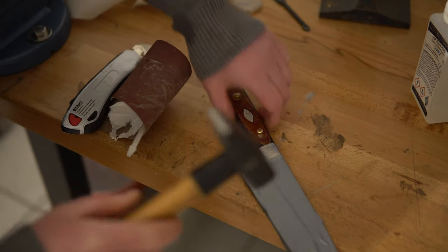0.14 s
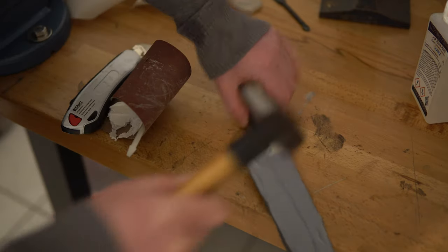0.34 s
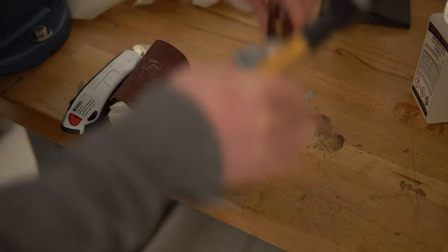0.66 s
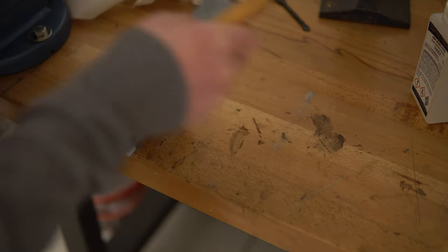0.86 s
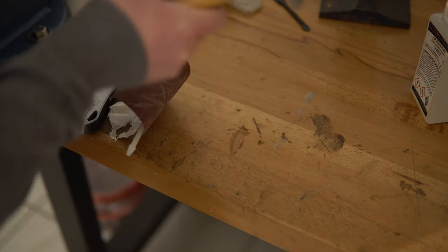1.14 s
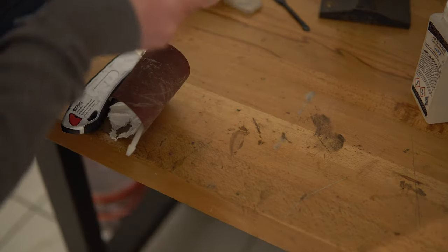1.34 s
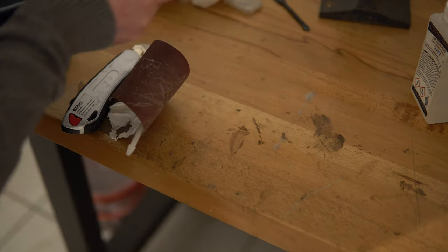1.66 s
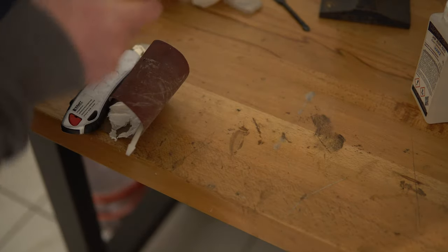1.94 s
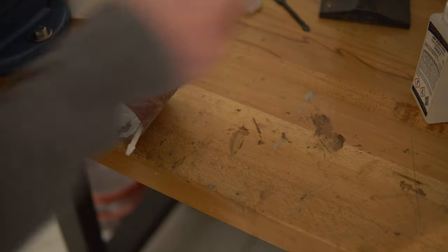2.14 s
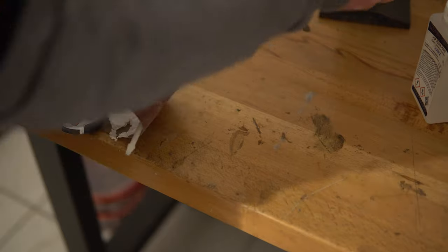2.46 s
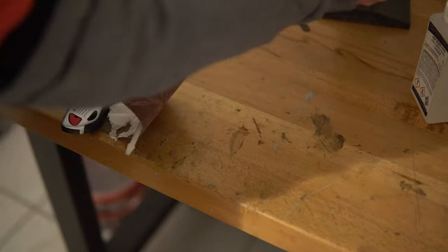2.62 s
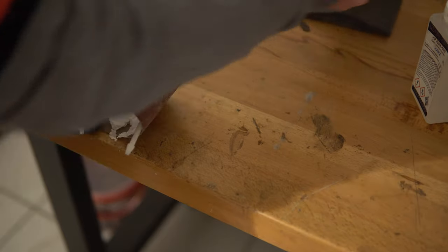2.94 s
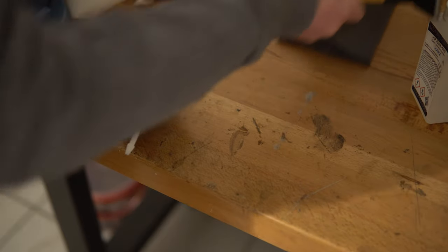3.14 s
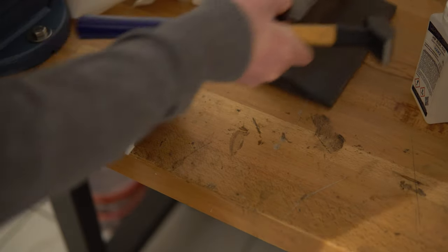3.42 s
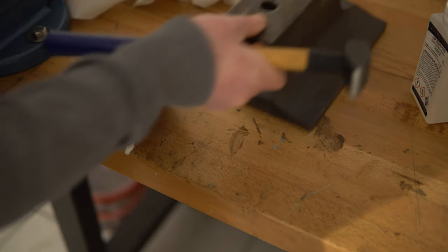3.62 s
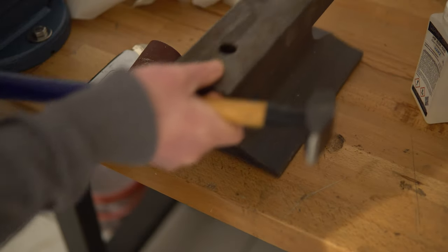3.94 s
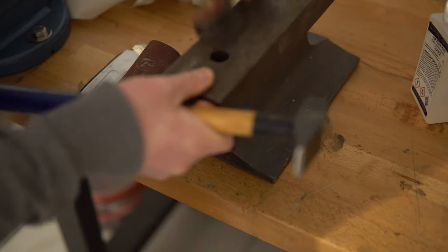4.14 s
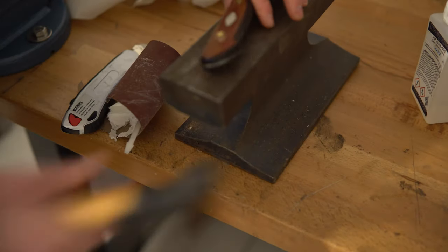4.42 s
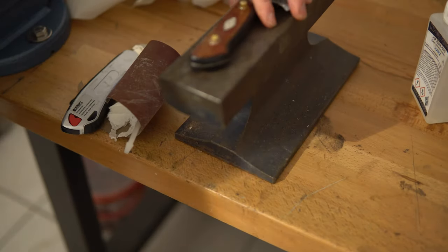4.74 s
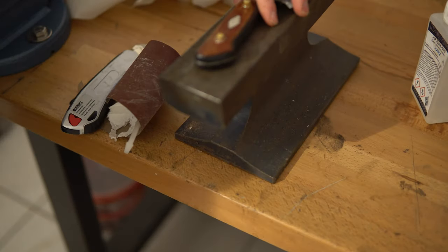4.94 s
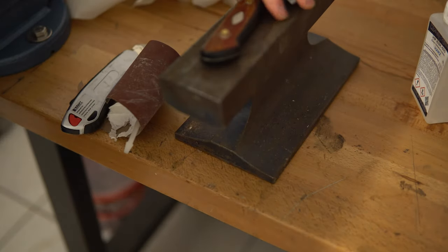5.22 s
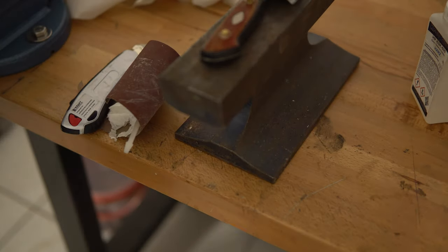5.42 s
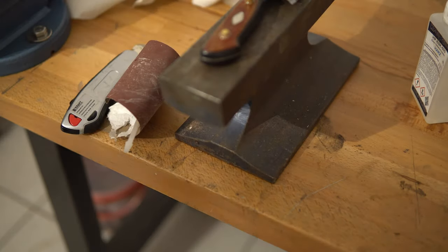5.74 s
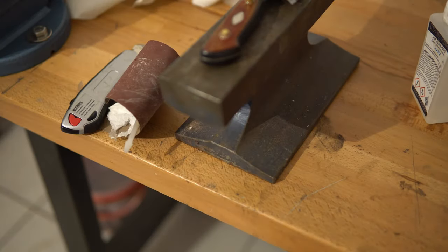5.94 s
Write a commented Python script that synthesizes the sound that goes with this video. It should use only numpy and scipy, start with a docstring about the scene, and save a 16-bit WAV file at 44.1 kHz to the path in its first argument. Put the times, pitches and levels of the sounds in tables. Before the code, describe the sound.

Quiet handling in a workshop, a loud gritty stick-slip scrape of heavy metal on wood, then a knife lands hard on steel and slides briefly.

```python
"""In a small workshop with a low rumble, a sleeve rustles throughout and a wooden bench thumps dully.
A knife blade rings as it is lifted, then small things click and scrape as they are nudged aside.
A hand rubs the steel anvil and drags it: stick-slip jerks shake the boards, noise makes the scrape and
crushed grit, and narrow resonances make the steel sing. Then the knife lands on the anvil in short noise
bursts and thumps the bench, its handle ticks, and shaped noise strokes push it along the steel."""
import sys
import numpy as np
from scipy import signal
from scipy.fft import rfft, irfft, next_fast_len
from scipy.io import wavfile
from scipy.ndimage import uniform_filter1d, map_coordinates

SR = 44100
rng = np.random.default_rng(int(sys.argv[2]) if len(sys.argv) > 2 else 0)


def materialize(psi):
    """Save the field psi as 16-bit PCM at rate SR to the path in sys.argv[1].

    A 1-D psi becomes a single channel; in a 2-D psi each row is a channel.
    """
    bounded = np.clip(np.atleast_2d(psi).T, -1, 1)
    quanta = np.round(bounded * 32767).astype(np.int16)
    wavfile.write(sys.argv[1], SR, quanta)


N = 267687  # length in samples

# In resonance and colour tables level_db compares the rows with each other.
# colour of the low room and bench rumble: pitch_hz, level_db
RUMBLE_COLOUR = [(20, -28), (45, -11.5), (70, 4.5), (110, -10.5), (280, -1), (500, -7), (1000, -23),
                 (3000, -43)]
# how alike left and right are (1 = the same): pitch_hz, likeness
ALIKE = [(25, .98), (70, .997), (140, .987), (280, .955), (550, .84), (1100, .79), (2200, .55), (4500, .42),
         (10000, .25)]
# left minus right for a source fully to one side; each source takes a share: pitch_hz, difference_db
LEAN = [(200, 0), (550, -.6), (1100, -1.6), (2200, -2.4), (4500, -1.2), (12000, -1.2)]
# how long the room takes to die away by 60 dB: pitch_hz, decay_s
WORKSHOP = [(120, 0.46), (500, 0.63), (2000, 0.64), (5000, 0.56), (12000, 0.26)]
# how much the arm stirs its sleeve and leans on the bench, before each layer's offset: time_s, level_db
ARM = [(0, -69), (.6, -64.5), (1.3, -60.5), (2.2, -62), (2.38, -55.5), (4.3, -56), (4.8, -52), (5.4, -54),
       (5.65, -47.5)]
# quick swishes of the cloth: peak_s, half_length_s, level_db
SWISHES = [(0.326, .035, -67.5), (0.644, 0.097, -63.5), (1.428, 0.077, -58), (2.446, 0.093, -55.5),
           (2.743, 0.16, -54), (4.24, 0.02, -57), (4.9, 0.044, -57), (5.698, .06, -45), (5.858, 0.013, -49)]
# colours of rubbing cloth and of its hissing fibres: pitch_hz, level_db
RUB_COLOUR = [(150, 5.5), (300, 1.5), (600, 1), (1000, 0.5), (1500, 0), (2600, 1.5), (4000, -3), (6000, -8),
              (12000, -10)]
HISS_COLOUR = [(1500, -53), (4000, -3.5), (7000, -3), (11000, -3), (15500, -8.5)]
# dull thumps of the bench, some as the knife lands, each a few contacts:
# start_s, level_db, contact_hz, gap_s, loss_db per contact
BUMPS = [(.003, -52.5, 406, .04, 4.5), (.168, -53.5, 417, 0.044, 3), (2.385, -58, 260, .045, 6),
         (4.521, -32.5, 407, 0.033, 1), (4.59, -32, 142, 0.05, 10), (4.86, -49.5, 530, 0.058, 5),
         (5.094, -42, 455, 0.018, 4.5), (5.464, -39, 242, 0.023, 13), (5.524, -41, 358, .04, 17)]
# resonances of the boards, damped by hands pressing on them: pitch_hz, width_hz, level_db
KNOCK = [(79, 23, 0.5), (139, 18.5, 0), (199, 43, 4), (298, 20.4, 3), (338.5, 9.7, 4), (431, 36, -1),
         (508, 64, -0.5), (684, 39, -2.5), (810, 45, -3), (1400, 450, -14)]
# ring of the lifted blade: pitch_hz, level_db, decay_s (time to fall by 60 dB)
BLADE = [(2570, -71, 0.97), (2830, -68, .4), (4350, -62, 0.19), (4554, -72, .5), (6089, -74, .5)]
# small things nudged aside: start_s, level_db, contact_hz
CLICKS = [(.5996, -55, 12000), (.6745, -49.5, 3200), (.9473, -54.5, 2800), (.9738, -48.5, 1920),
          (1.1324, -45.5, 1990), (1.3674, -48.5, 3340)]
# resonances of those small things: pitch_hz, width_hz, level_db
CLUTTER = [(678, 43, 2), (1370, 140, 0), (2210, 950, -2.5), (2970, 560, 0.5), (3770, 1000, -5),
           (7050, 1600, -6.5), (11100, 4800, -10.5)]
# one of them scrapes across the bench: start_s, length_s, level_db
SHOVE = (1.21, 0.21, -58.5)
# the hand finds the anvil with a hollow rub: start_s, length_s, level_db
GRASP = (2.28, .17, -66)
# resonance of that hollow rub: pitch_hz, width_hz, level_db
GRASP_BODY = [(850, 74, 0)]
# effort of dragging the anvil: time_s, effort_db
DRAG = [(2.74, -59), (2.884, -26.5), (3.062, -27), (3.314, -21.5), (3.656, -30.5), (3.694, -27.5),
        (4.008, -30), (4.278, -58), (4.42, -68.5)]
# average rate at which its foot sticks and slips: time_s, slips_per_s
SLIP = [(2.78, 150), (2.88, 265), (3.15, 283), (3.32, 215), (3.5, 218), (3.78, 264), (3.95, 215)]
# resonances of the bench top: pitch_hz, width_hz, level_db
BENCH = [(77, 12, -10), (113, 8, -11), (143, 7, -1), (156, 7, -7), (198, 7, 2), (221, 7, 2), (259, 16, -1),
         (298, 20, -2), (345, 25, -6), (378, 12, -5), (421, 16, -6), (480, 25, -11), (540, 16, -6),
         (612, 25, -16), (698, 25, -12), (808, 22, -14)]
# the foot catches and judders harder: start_s, length_s, extra_db
CATCHES = [(2.855, 0.081, 8), (3.229, .22, 7.5), (3.884, 0.14, 3)]
# the heavy foot lurches and heaves the bench: start_s, level_db, contact_hz
LURCHES = [(2.8, -36.5, 77), (3.225, -32, 75), (3.305, -53, 78.9), (3.335, -27, 146.6), (3.405, -19, 152),
           (3.465, -25.5, 147)]
# colours of the scraping foot and of crushed grit: pitch_hz, level_db
SCRAPE_COLOUR = [(180, -98), (300, -5.5), (351, -16.5), (463, -9), (550, -6), (636, -8.5), (697, -10),
                 (1180, -15), (1460, -19), (1600, -17), (3260, -23), (3970, -27.5), (7000, -39),
                 (9100, -60), (15400, -120)]
GRIT_COLOUR = [(2500, 18), (5000, 6), (7000, 4.5), (10000, 3), (15500, -2)]
# resonances of the anvil's steel: pitch_hz, width_hz, level_db
ANVIL = [(1013, 12, -19), (1329, 16, -20), (1411, 16, -18), (1524, 9, -21), (2169, 14, -24),
         (2934, 20, -27), (4230, 120, -24), (4931, 60, -28), (5577, 14, -30), (5744, 12, -33),
         (7327, 30, -32), (8204, 20, -31), (9238, 25, -33), (11283, 16, -30), (12037, 9, -37),
         (14691, 20, -40)]
# one resonance of the steel takes over and squeals: peak_s, half_length_s, pitch_hz, extra_db
SQUEALS = [(2.86, .09, 1411, 9), (3.0, .16, 2934, 9), (3.18, .2, 4931, 6), (3.33, .13, 1524, 9),
           (3.47, .11, 12037, 11), (3.94, .15, 5744, 11)]
# the foot runs over a patch of grit: start_s, length_s, extra_db
GRIT_PATCHES = [(2.829, .03, 12), (3.24, 0.13, 4.5), (3.65, 0.23, 6)]
# the foot bites on grit: start_s, level_db, contact_hz
CRUNCH = [(2.8335, -36.5, 8000), (2.838, -40, 10000), (2.957, -47, 10000), (2.962, -48, 9000)]
# resonances of those bites: pitch_hz, width_hz, level_db
CRUNCH_MODES = [(4180, 2600, 16), (12300, 5300, 16)]
# the knife lands on the anvil: start_s, level_db, contact_hz
LANDING = [(4.5185, -26.5, 5050), (4.5245, -24.5, 1500), (4.5565, -32.5, 1230), (4.5665, -46, 8950),
           (4.577, -37.5, 3500)]
# resonances of the knife lying on steel: pitch_hz, width_hz, level_db
KNIFE = [(575, 183, 10), (808, 960, 1), (1193, 140, 3), (1360, 34, 0.5), (1460, 48, 6), (1625, 180, 0),
         (1875, 60, 1.5), (2130, 120, -1.5), (2880, 240, 2.5), (3040, 180, 2), (3640, 750, -10.5),
         (4250, 105, -3.5), (4750, 370, -8.5), (5020, 430, -11), (7050, 2100, -14), (9300, 1160, -7.5),
         (12200, 2800, -10)]
# the knife is pushed over the anvil: start_s, length_s, level_db, brightness_db per octave
PUSHES = [(4.842, 0.13, -52.5, -1), (5.434, .35, -47.5, -3.5), (5.923, 0.11, -35, 2.2),
          (5.979, .07, -33, -1.5)]
# colour of the pushed knife before brightening: pitch_hz, level_db
SLIDE_COLOUR = [(150, -22), (290, -9), (400, -15), (690, -7.5), (1000, -6.5), (1400, -7), (2000, -6.5),
                (2750, -5.5), (3500, -8), (4900, -14), (11000, -14), (15500, -16.5)]
# the handle ticks on the steel: start_s, level_db, contact_hz
TICK = [(5.055, -42, 11000)]
# resonances of the tick: pitch_hz, width_hz, level_db
TICK_MODES = [(3700, 350, 5), (5200, 1700, -2), (9250, 950, 3.5), (14000, 3000, -8)]

TOP_HZ = 15800  # nothing is heard from here up
STEADY_DB = -29  # the effort at which the anvil slides evenly
# how each part of the drag follows the effort: (dB when sliding evenly, dB per dB of effort)
JUDDER_LAW, SCRAPE_LAW, GRIT_LAW, BOOM_LAW = (-30, 0.65), (-31, 0.89), (-41, 1), (-44, 0.29)
BREAK_S, BREAK_RISE_S = 2.785, 0.029  # when the foot breaks free, and how fast the bench starts to shake
# seconds to rise, and seconds to fall to about a third
CATCH_ATTACK_S, CATCH_RELEASE_S = .05, 0.034
PATCH_ATTACK_S, PATCH_RELEASE_S = 0.0038, 0.012
PUSH_ATTACK_S, PUSH_RELEASE_S = 0.024, 0.076
RUB_ATTACK_S, RUB_RELEASE_S = 0.036, 0.084
DULLING = 0.8  # contact pitch of each rebound over the one before


def amp(db):
    """Turns decibels into gain."""
    return 10 ** (np.asarray(db) / 20)


def unit(x):
    """Scales x to an average (rms) strength of 1."""
    return x / np.sqrt(np.mean(x ** 2) + 1e-20)


def along(points, hz):
    """Reads a table of (pitch, value) between its rows, on a log pitch axis."""
    f, v = np.transpose(points)
    return np.interp(np.log(hz + 1), np.log(f), v)


def gains(rows, fade=None):
    """One gain per sample from (s, dB) rows; outside them it holds, or fades out over the fade time."""
    s, db = np.transpose(rows)
    t = np.arange(N) / SR
    gain = amp(np.interp(t, s, db))
    if fade:
        outside = np.maximum(np.maximum(s[0] - t, t - s[-1]), 0)
        gain = gain * np.exp(-outside / fade)
    return gain


def wobble(rate):
    """A smooth random curve with rate random points a second."""
    knots = rng.standard_normal(int(N * rate / SR) + 4)
    return map_coordinates(knots, [np.arange(N) * rate / SR])


def filtered(x, response):
    """Multiplies the spectrum of x by a response that depends on frequency."""
    n = x.shape[-1]
    m = next_fast_len(n + SR // 2)  # spare room so that the end does not wrap to the start
    return irfft(rfft(x, m) * response(np.fft.rfftfreq(m, 1 / SR)), m)[..., :n]


def coloured(x, spectrum):
    """Gives x a (pitch, dB) colour, at rms 1."""
    return unit(filtered(x, lambda hz: amp(along(spectrum, hz))))


def resonate(x, modes):
    """Rings x through resonances, each favouring a band around its own pitch."""
    def response(f):
        total = 0
        for k, (centre, width, db) in enumerate(modes):
            peak = 1j * f * width / (centre * centre - f * f + 1j * f * width)
            total = total + (-1) ** k * amp(db) * peak  # signs alternate
        return total
    return filtered(x, response)


def spread(x):
    """Makes two unrelated signals a stereo pair: alike in the bass, apart in the treble."""
    def shares(hz):
        turn = np.arccos(np.clip(along(ALIKE, hz), -1, 1)) / 2
        return np.array([np.cos(turn), np.sin(turn)])
    mid, side = filtered(x, shares)
    return np.array([mid + side, mid - side])


def friction(grain_db, grain_rate):
    """Stereo noise that comes in small clumps, as rough surfaces catch."""
    noise = spread(rng.standard_normal((2, N)))
    return unit(noise * amp(grain_db * wobble(grain_rate)))


def speckled(x, depth_db, spacing_hz):
    """The many close, weak resonances of wood and steel ripple the spectrum of x."""
    knots = rng.standard_normal(SR // 4)
    ripple = lambda hz: amp(depth_db * map_coordinates(knots, [hz / spacing_hz], order=1))
    return unit(filtered(x, ripple))


def strikes(rows, modes, contact_t60, room_db, breadth):
    """Each contact is a noise burst plus room tail, pitched by its hardness and rung through the modes."""
    out, t = np.zeros((2, N + SR)), np.arange(SR // 2) / SR
    for s, db, contact_hz in rows:
        # in the room tail every band of noise dies away at its own speed
        hz, age, z = signal.stft(rng.standard_normal((2, len(t))), SR, nperseg=256)
        decay = amp(-60 * age / along(WORKSHOP, hz)[:, None])
        tail = signal.istft(z * decay, SR, nperseg=256)[1][:, :len(t)]
        burst = rng.standard_normal((2, len(t))) * amp(-60 * t / contact_t60)
        force = spread(unit(burst) + amp(room_db) * unit(tail))
        contact = resonate(force, [(contact_hz, breadth * contact_hz, 0)])
        hit = resonate(contact, modes)
        # the level of a hit is that of its loudest sixtieth of a second
        loudest = np.sqrt(uniform_filter1d(np.mean(hit ** 2, axis=0), size=SR // 60).max())
        out[:, round(s * SR):][:, :len(t)] += amp(db) * hit / loudest
    return out[:, :N]


def stroke(start, length, attack, release):
    """An envelope that rises, holds until its length is over and dies away."""
    t = np.arange(N) / SR - start
    return np.clip(t / attack, 0, 1) * np.exp(-np.maximum(t - length, 0) / release)


def swell(s, half):
    """A smooth rise and fall around a moment."""
    return np.exp(-((np.arange(N) / SR - s) / half) ** 2)


def driven(law):
    """The gain of a layer that grows with the effort of the drag."""
    db, growth = law
    return amp(db) * (gains(DRAG, fade=0.016) / amp(STEADY_DB)) ** growth


def broken_free():
    """0 while the anvil still sticks, rising to 1 as it begins to move."""
    return np.clip((np.arange(N) / SR - BREAK_S) / BREAK_RISE_S, 0, 1)


def room_rumble(floor_db=-77, leaning_db=-3.5):
    """Low room noise; once the anvil moves, the bench booms under the drag and the leaning arm."""
    boom = broken_free() * np.hypot(amp(leaning_db) * gains(ARM), driven(BOOM_LAW))
    noise = spread(rng.standard_normal((2, N)))
    return np.hypot(amp(floor_db), boom) * coloured(noise, RUMBLE_COLOUR)


def sleeve(rub_db=-1, hiss_db=-5):
    """Cloth rubs and hisses as the arm moves, and swishes at each quick turn."""
    arm = gains(ARM)
    swishes = sum(amp(db) * swell(s, half) for s, half, db in SWISHES)
    cloth = friction(grain_db=0.65, grain_rate=61)
    fibres = friction(grain_db=1, grain_rate=600)
    rub = amp(rub_db) * arm * coloured(cloth, RUB_COLOUR)
    hiss = np.hypot(amp(hiss_db) * arm, swishes) * coloured(fibres, HISS_COLOUR)
    return rub + hiss


def settling(bumps, count):
    """Each bump rebounds, every contact softer and duller than the last."""
    contacts = []
    for s, db, hz, gap, loss_db in bumps:
        for k in range(count):
            contacts.append((s + k * gap, db - k * loss_db, hz * DULLING ** k))
    return contacts


def rubbing(start, length, db, modes):
    """A short rub that sounds through the resonances of the thing touched."""
    rub = unit(resonate(friction(grain_db=4.0, grain_rate=76), modes))
    return amp(db) * stroke(start, length, RUB_ATTACK_S, RUB_RELEASE_S) * rub


def bumps_and_handling():
    """The bench thumps under hands and the landing knife; small things are nudged, the anvil is held."""
    bumps = strikes(settling(BUMPS, count=3), KNOCK, contact_t60=0.014, room_db=0, breadth=0.71)
    clicks = strikes(CLICKS, CLUTTER, contact_t60=0.02, room_db=0, breadth=2.4)
    shove = rubbing(*SHOVE, CLUTTER[1:5])
    grasp = rubbing(*GRASP, GRASP_BODY)
    return bumps + clicks + shove + grasp


def blade_ring(start=.297):
    """The blade rings faintly as it leaves the bench: fading tones with a slightly unsteady phase."""
    t = np.maximum(np.arange(N) / SR - start, 0)
    ring = 0
    for hz, level, t60 in BLADE:
        tone = np.sin(2 * np.pi * hz * t + 1.8 * wobble(119))
        ring = ring + amp(level - 60 * t / t60) * tone
    return ring * (t > 0)


def slips(scatter, size_db):
    """Jerks of a foot that sticks and slips, uneven in time and size."""
    rate = np.interp(np.arange(N) / SR, *np.transpose(SLIP))
    uneven_rate = rate * np.exp(scatter * wobble(300))
    # a slip happens each time the running count passes a whole number
    at = np.flatnonzero(np.diff(np.floor(np.cumsum(uneven_rate) / SR)))
    return np.bincount(at, amp(size_db * rng.standard_normal(len(at))), N)


def juddering_boards():
    """Slips and rough friction shake the bench top, which rings at its own pitches."""
    catch_db = sum(db * stroke(s, length, CATCH_ATTACK_S, CATCH_RELEASE_S) for s, length, db in CATCHES)
    jerks = unit(slips(scatter=.23, size_db=4.0)) + 0.76 * friction(grain_db=-1.5, grain_rate=120)
    return broken_free() * driven(JUDDER_LAW) * amp(catch_db) * unit(resonate(jerks, BENCH))


def singing_steel(swell_db, swells_per_s):
    """Friction feeds each anvil mode; they waver as the foot's contact shifts, and at times one squeals."""
    drive, out = friction(grain_db=2, grain_rate=13), 0
    nearest = lambda f: min(ANVIL, key=lambda mode: abs(mode[0] - f))[0]
    for hz, width, db in ANVIL:
        ring = signal.lfilter(*signal.iirpeak(hz, hz / width, SR), drive)
        wavering = unit(amp(swell_db * wobble(swells_per_s)) * ring)
        squeal_db = sum(extra * swell(s, half) for s, half, f, extra in SQUEALS if nearest(f) == hz)
        out = out + amp(db + squeal_db) * wavering
    return out


def scraping_foot(steel_db=3):
    """The grinding foot scrapes over the boards and keeps the steel ringing."""
    grind = speckled(friction(grain_db=1.8, grain_rate=150), depth_db=3, spacing_hz=22)
    steel = singing_steel(swell_db=3, swells_per_s=8)
    return driven(SCRAPE_LAW) * (coloured(grind, SCRAPE_COLOUR) + amp(steel_db) * steel)


def crushed_grit():
    """Grit under the foot hisses as it is ground, louder over patches, and crunches when bitten."""
    patch_db = sum(db * stroke(s, length, PATCH_ATTACK_S, PATCH_RELEASE_S) for s, length, db in GRIT_PATCHES)
    grains = speckled(friction(grain_db=0.5, grain_rate=310), depth_db=4.5, spacing_hz=34.96)
    sand = driven(GRIT_LAW) * amp(patch_db) * coloured(grains, GRIT_COLOUR)
    crunch = strikes(CRUNCH, CRUNCH_MODES, contact_t60=0.023, room_db=-1, breadth=8.6)
    return sand + crunch


def anvil_drag():
    """The dragged anvil judders, heaves the bench, scrapes and crushes grit."""
    heave = strikes(LURCHES, KNOCK, contact_t60=0.03906, room_db=-6, breadth=0.18)
    return juddering_boards() + heave + scraping_foot() + crushed_grit()


def knife_landing():
    """The knife clatters onto the anvil, and its handle ticks on the steel."""
    crack = strikes(LANDING[:1], KNIFE, contact_t60=0.014, room_db=-2.5, breadth=0.19)  # first, hard touch
    clatter = strikes(LANDING[1:], KNIFE, contact_t60=0.012, room_db=1.0, breadth=2.1)
    tick = strikes(TICK, TICK_MODES, contact_t60=.011, room_db=-9, breadth=1.3)
    return crack + clatter + tick


def push(start, length, db, brightness_db):
    """The knife rubs over the steel in one short stroke."""
    rub = speckled(friction(grain_db=0.0, grain_rate=560), depth_db=4.0, spacing_hz=58.95)
    lowest_hz = SLIDE_COLOUR[0][0]
    colour = [(hz, level + brightness_db * np.log2(hz / lowest_hz)) for hz, level in SLIDE_COLOUR]
    return amp(db) * stroke(start, length, PUSH_ATTACK_S, PUSH_RELEASE_S) * coloured(rub, colour)


def knife():
    """The knife rings when lifted, lands on the anvil and is pushed along the steel."""
    return blade_ring() + knife_landing() + sum(push(*row) for row in PUSHES)


def place(x, share):
    """Leans a source to one side by a share of the left-right difference."""
    return filtered(x, lambda hz: amp(share * np.outer([.5, -.5], along(LEAN, hz))))


def scene(near_share=0.11):
    """The anvil stands to the right; bumps, handling, knife and sleeve are nearer the middle."""
    near = bumps_and_handling() + sleeve() + knife()
    return room_rumble() + place(near, near_share) + place(anvil_drag(), 0.93)


def record(dry):
    """Removes everything from the top frequency up."""
    return filtered(dry, lambda hz: hz < TOP_HZ)


dry = scene()
out = record(dry)
materialize(out)
```